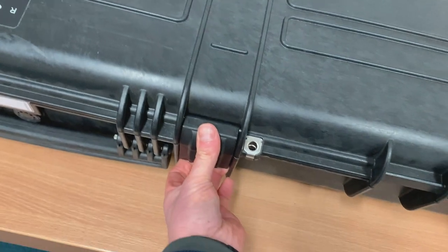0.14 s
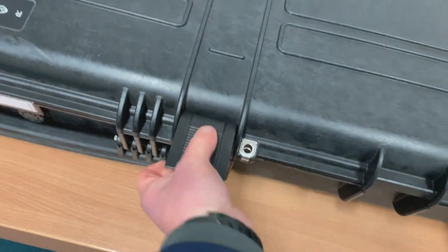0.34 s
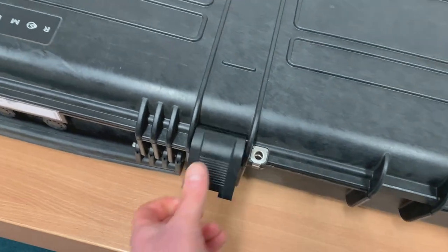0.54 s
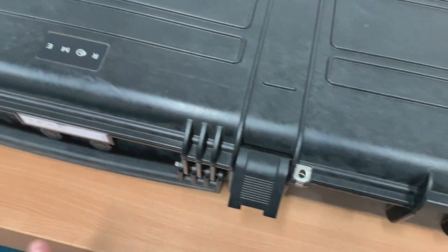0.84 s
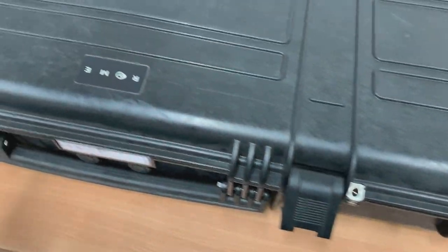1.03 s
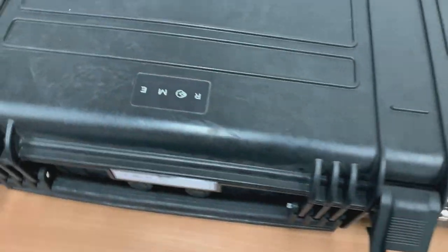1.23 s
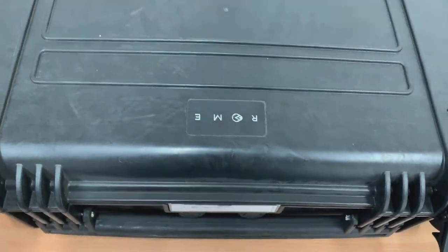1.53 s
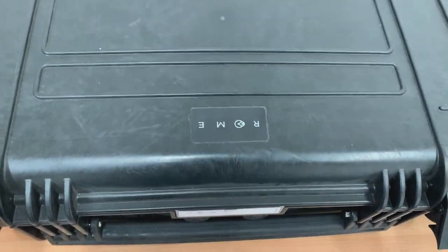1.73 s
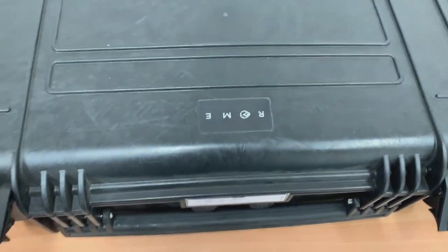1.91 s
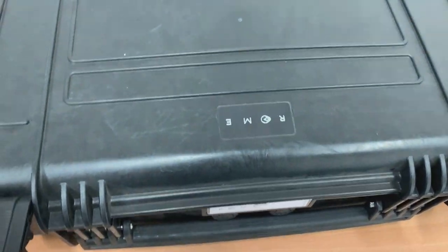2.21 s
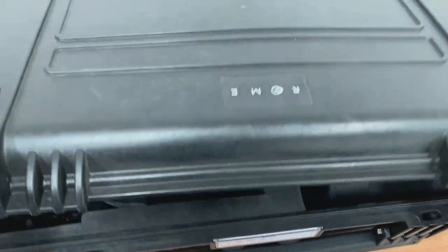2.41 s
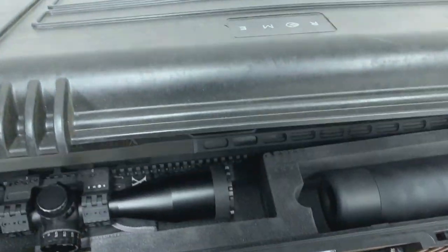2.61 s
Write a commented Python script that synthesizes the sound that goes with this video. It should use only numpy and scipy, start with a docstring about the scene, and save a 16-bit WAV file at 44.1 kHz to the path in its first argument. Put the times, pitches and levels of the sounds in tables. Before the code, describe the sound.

A plastic latch on a large hard case snaps open at 0.25 seconds, a sharp clack with a hollow thump, bouncing until 0.36. A softer knock follows at 0.57, with tiny rattles to 0.8. Near quiet until 1.4, then thin clicks at 1.46 and 1.68 amid faint hand rubbing. From 2.2 to 2.48 the lid scrapes and squeaks free with clustered low booms, fading into a lightly reverberant quiet room.

```python
"""In a quiet room, plastic latches of a big hard case snap open on a wooden table, a phone held close above.
Each snap rings the latch's short modes and thumps the hollow case; loose fittings buzz on after it.
A loose latch rattles out, a hand slides on as grainy noise, and a second latch clicks.
Then the lid squeaks off its seal and swings up, booming. The room rings after all."""
import sys
import numpy as np
from scipy import signal
from scipy.fft import rfft, irfft
from scipy.io import wavfile
from scipy.ndimage import uniform_filter1d, map_coordinates

SR = 44100
rng = np.random.default_rng(int(sys.argv[2]) if len(sys.argv) > 2 else 0)


def decibels_to_gain(level_db):
    """Convert a level in decibels to a linear amplitude gain (20 dB per decade)."""
    exponent = np.asarray(level_db, float) / 20
    return 10 ** exponent


def to_wav(sig):
    """Store sig (one row per channel, or 1-D mono) as 16-bit WAV at the path in sys.argv[1].

    Samples outside -1..1 are clipped; the rate is SR.
    """
    pcm = np.clip(np.atleast_2d(sig), -1, 1) * 32767
    pcm = np.round(pcm).astype(np.int16)
    wavfile.write(sys.argv[1], SR, pcm.T)  # frames by channels


N = 121275  # 2.75 s


def level(x, db):
    """Scale a sound to an rms level in dB."""
    return x * decibels_to_gain(db) / np.sqrt(np.mean(x ** 2))


def colour(x, points):
    """Filter a sound by (pitch_hz, gain_db) points."""
    hz, db = np.array(points).T
    f = np.arange(len(x) // 2 + 1) * SR / len(x) + 1
    gain_db = np.interp(np.log(f), np.log(hz), db)
    return irfft(rfft(x) * decibels_to_gain(gain_db), len(x))


def ring(hz, db, t60, phase, rise, size):
    """Sum of dying tones, one per mode, that swell together over the contact time."""
    t = np.arange(size) / SR
    tones = np.sin(2 * np.pi * hz[:, None] * t + phase[:, None])
    decay = 1000. ** (-t / t60[:, None])
    modes = decibels_to_gain(db)[:, None] * tones * decay
    return modes.sum(axis=0) * (1 - np.exp(-(t / rise) ** 2))


def add(out, x, s):
    """Mix x into out, starting at time s."""
    i = int(s * SR)
    out[:, i:i + x.shape[1]] += x[:, :N - i]


# tone of the quiet room's noise, only its shape counts: pitch_hz [Hz], gain_db [dB]
QUIET_TONE = [(12, -34.5), (20, -9), (74, 8.5), (104, -19), (678, -30.5), (9670, -33.5), (11800, -59),
              (14700, -28), (16000, -52)]


def quiet_room():
    """Steady filtered noise, with a part shared by both sides and a part opposite on each."""
    mid, side = (level(colour(rng.standard_normal(N), QUIET_TONE), -68) for _ in range(2))
    side = colour(side, [(60, -15.5), (1000, -1.5)])  # weaker in the bass
    return np.array([mid + side, mid - side])


# room tail by band: pitch_hz [Hz], t60_s (time to fade by 60 dB) [s],
# level_db (relative) [dB], likeness left-right [0 to 1]
ROOM = [(56.5, .7, -16.5, .97), (125, .8, -8.5, .9), (250, .7, -4, .7), (500, .65, -7, 0.82),
        (1000, 0.43, -4.5, .3), (2157, .6, -16, .3), (3704, 0.67, -13, .3), (7750, .35, -15.5, .3),
        (12800, .25, -23, .2)]
ROOM_DELAY_S = 0.0013  # how slowly the tail swells in


def room(x):
    """Walls return a diffuse tail: fading noise in overlapping bands, alike left and right in the bass."""
    size = SR  # one second
    t, tail = np.arange(size) / SR, np.zeros((2, size))
    f = np.arange(size // 2 + 1) + 1.
    for hz, t60, db, alike in ROOM:
        shape = np.clip(1 - np.abs(np.log2(f / hz)), 0, 1) ** .5  # an octave to each side
        mid, side = irfft(rfft(rng.standard_normal((2, size))) * shape, size)
        both = np.sqrt(1 + alike) * mid + np.sqrt(1 - alike) * side * np.array([[1], [-1]])
        fade = 1000. ** (-t / t60) * np.sqrt(np.log(1000) / t60 / SR)  # long tails start softer
        tail += both * decibels_to_gain(db) * fade
    tail *= 1 - np.exp(-(t / ROOM_DELAY_S) ** 2)
    return signal.fftconvolve(x[None], tail)[:, :N]


# loudness of the rubbing before its grain: time_s [s], level_db [dB]
RUB = [(0, -87), (1.0, -91.5), (1.12, -67), (1.22, -62.5), (1.33, -59.5), (1.47, -45), (1.55, -53.5),
       (1.62, -43.5), (1.75, -57), (1.9, -55.5), (2.06, -59), (2.1, -51.5), (2.17, -54), (2.2, -27),
       (2.23, -38.5), (2.26, -35.5), (2.29, -39.5), (2.335, -42), (2.36, -31.5), (2.44, -42.5), (2.55, -77),
       (2.75, -76)]
# tone of the hand on the shell, only its shape counts: pitch_hz [Hz], gain_db [dB]
HAND_TONE = [(35, -26.5), (60, -6), (130, -14.5), (579, -21.5), (715, -26.5), (1620, -29), (3040, -19.5),
             (3420, -33.5), (8320, -45.5), (16000, -66)]
# tone of the lid leaving its seal, only its shape counts: pitch_hz [Hz], gain_db [dB]
SEAL_TONE = [(530, -31.5), (900, -10.5), (2860, 5.5), (3340, -7.5), (4310, -5.5), (5410, -19.5),
             (6560, -10.5), (10200, -21), (11600, -36.5), (13700, -19), (16000, -37.5)]
SEAL_FROM_S = 2.07
GRAIN_DB, GRAIN_S = 4.5, .004  # swing per unit of grain noise; time between grains


def rubbing():
    """Friction is noise of flickering level: the hand on the shell, then the lid leaving its seal."""
    t, hold = np.arange(N) / SR, int(GRAIN_S * SR)
    steps = np.repeat(rng.standard_normal(N // hold + 1), hold)
    grain = uniform_filter1d(steps, hold)[:N]
    hand = level(colour(rng.standard_normal(N), HAND_TONE), 0)
    seal = level(colour(rng.standard_normal(N), SEAL_TONE), 0)
    loudness_db = np.interp(t, *np.array(RUB).T) + GRAIN_DB * grain
    return np.where(t < SEAL_FROM_S, hand, seal) * decibels_to_gain(loudness_db)


# tone of the buzz, only its shape counts: pitch_hz [Hz], gain_db [dB]
BUZZ_TONE = [(410, -30.5), (700, -6.5), (3030, -1.5), (3740, -10), (8760, -21.5), (10800, -25.5),
             (11700, -38), (14200, -22), (15400, -42), (16000, -89.5)]
BUZZ_DB, BUZZ_T60_S = -20, .3  # below the click's high modes; time to fade by 60 dB


def buzz():
    """Loose fittings buzz on after each click as fading noise, as strong as its high modes were struck."""
    kicks = np.zeros(N)
    s, db, _, _, high_db = np.array(CLICKS).T
    kick_power = decibels_to_gain(db + high_db + CLICK_GAIN_DB + BUZZ_DB) ** 2
    np.add.at(kicks, (s * SR).astype(int), kick_power)
    power = signal.lfilter([1], [1, -1000. ** (-2 / BUZZ_T60_S / SR)], kicks)
    loudness = np.sqrt(uniform_filter1d(power, size=129).clip(0))
    mid, side = (level(colour(rng.standard_normal(N), BUZZ_TONE), 0) for _ in range(2))
    return loudness * np.array([mid + side, mid - side])


# squeaks of the seal letting go: peak_s [s], level_db [dB], pitch_hz [Hz],
# length_s (from the peak down to about a third) [s]
SQUEAKS = [(2.2133, -29, 4400, 0.0035), (2.225, -28.5, 5370, 0.0038), (2.366, -24.5, 1620, 0.0052)]


def squeaks():
    """Sticking and slipping makes brief steady tones with a soft swell and fade."""
    t, out = np.arange(N) / SR, np.zeros(N)
    for s, db, hz, length in SQUEAKS:
        tone = np.sin(2 * np.pi * hz * (t - s))
        out += decibels_to_gain(db) * tone * np.exp(-((t - s) / length) ** 2)
    return out


# thumps into the case: start_s [s], level_db (peak) [dB], pitch_hz (favoured) [Hz], spread [octaves]
THUMPS = [(0.066, -50.5, 80, .6), (.249, -2.5, 343, 0.77), (0.2586, -7, 109, 0.64), (0.282, -23, 108, 0.42),
          (0.315, -10.5, 127, 1.1), (.337, -14, 198, 0.71), (0.358, -33.5, 149, 0.37),
          (0.572, -15.5, 354, 0.68), (0.583, -22.5, 171, .8), (0.596, -21, 110.5, 0.47),
          (0.636, -24, 121.3, 0.66), (.673, -25.5, 209.4, 0.96), (.745, -33.5, 203.6, 0.4),
          (0.796, -37, 150, 0.66), (1.19, -49.5, 250, 0.99), (1.32, -35, 119, 0.77),
          (1.398, -36.5, 115, 0.38), (1.42, -30.5, 400, 0.75), (1.466, -33.5, 200, 1),
          (1.61, -36.5, 598, 0.26), (1.679, -33.5, 133, 0.59), (1.812, -25.5, 250, 1),
          (1.822, -20.5, 115, 0.31), (2.1, -32, 270, 1.11), (2.2, -29, 500, 0.54),
          (2.207, -11.5, 389, 0.49), (2.214, -18.5, 110, 0.76), (2.234, -15.5, 93.4, 0.25),
          (2.26, -11, 350, 0.72), (2.27, -9, 110, 0.32), (2.288, -13.5, 117, 0.27), (2.302, -24.5, 875, .3),
          (2.3086, -6, 208, 0.27), (2.33, -11, 117, 0.51), (2.351, -12.5, 123, 0.52),
          (2.3709, -3.5, 159.5, 0.43), (2.374, -19.5, 646, 0.3), (2.395, -12.5, 248, .5),
          (2.412, -11, 286.5, 0.54), (2.426, -14.5, 250, 0.53), (2.441, -12.5, 307, 0.51),
          (2.452, -27, 870, 0.42), (2.455, -19, 250, .5), (2.478, -21, 216, 0.45), (2.522, -22, 250, 0.23),
          (2.58, -35, 200, 0.25), (2.698, -40.5, 206, 1)]
# modes of the case on the table: pitch_hz [Hz], level_db (relative) [dB], t60_s before any damping [s]
CASE = [(45.4, -8.5, 0.77), (65, -4.5, 0.37), (94.4, -4.5, 0.14), (117.4, -2.5, .22), (137.7, -3, .15),
        (186.5, -1, 0.093), (233.7, -3, .09), (286.1, -6.5, 0.1), (350.1, -4.5, 0.072), (389.5, -4, 0.069),
        (438, -8, .07), (571.5, -6, .06), (697.4, -7, 0.084), (899.4, -10.5, .07)]
LIFT_S, HELD_RING = 2.15, 0.69  # start of the lift; share of the ring time left under the hand
THUMP_RISE_CYCLES = 0.42  # contact time in cycles of the favoured pitch
THUMP_TURN_PER_KHZ = 3.9  # random phase between left and right, radians


def thumps():
    """Each thump sets off the case modes nearest its favoured pitch; low thumps push for longer.
    The lifting hand pulls instead of pushing and damps the lid."""
    out, (hz, mode_db, t60) = np.zeros((2, N)), np.array(CASE).T
    for s, db, centre, spread in THUMPS:
        near_db = mode_db - 3 * (np.log2(hz / centre) / spread) ** 2
        turn = THUMP_TURN_PER_KHZ * hz / 1000 * rng.standard_normal(len(hz)) / 2
        way, rings = (-1, t60 * HELD_RING) if s > LIFT_S else (1, t60)
        rise = THUMP_RISE_CYCLES / centre
        x = np.array([ring(hz, near_db, rings, k * turn, rise, size=SR // 3) for k in (1, -1)])
        add(out, way * decibels_to_gain(db) * x / np.abs(x).max(), s)
    return out


# latch clicks: start_s [s], level_db (before the shares and the common gain) [dB],
# then the shares low_db, middle_db, high_db of the three groups of modes [dB]
CLICKS = [(0.244, -11.5, -5, -14.5, -28), (0.2473, -12, -31, -39, -2.5), (0.2485, -7.5, -17, -15, -12.5),
          (0.252, 0, -6, -14.5, -23), (0.2559, -8.5, -17.5, -7, -15), (0.3102, -9, -4, -16, -3.5),
          (0.3151, -12.5, -4, -5.5, -6.5), (0.3283, -11.5, -7, -9.5, -3.5), (0.3353, -13, -3, 1.5, -5.5),
          (0.3482, -22, -24, -0.5, -15.5), (0.5684, -13, -11.5, -13, -29), (0.5739, -28, -11, -26, -9),
          (0.5839, -20, -5.5, -8.5, -12), (0.6161, -21, 0.5, -10.5, -33), (0.6298, -34, -4.5, -9, -18.5),
          (0.6678, -24.5, -10, -9.5, -24.5), (0.742, -32.5, -9, -12.5, -40), (0.7881, -37, -6.5, -13, -33),
          (0.8172, -37, -12.5, -22, -35.5), (1.2885, -66.5, -14.5, -12, -8), (1.3175, -44, -11, -12.5, -9),
          (1.3926, -48, -27.5, 11, -10.5), (1.4197, -37.5, -2.5, 2, -8), (1.4566, -8, -31, -18.5, -39),
          (1.4619, -38.5, -7, 4, -15), (1.4674, -19.5, -21, -13.5, -20), (1.4739, -42, -29, 11.5, -13),
          (1.4792, -42, -23, -8, -28), (1.497, -30, -45, -36, -20.5), (1.508, -18, -13.5, -2.5, -23.5),
          (1.6116, -37.5, -5, -20, -19), (1.6453, -37, -8, 4, -25), (1.6736, -21.5, -13, -28, -17),
          (1.6765, -9.5, -25, -7, -23), (1.728, -42, 1.5, -24, -21), (1.8195, -30, -12.5, -11, -29),
          (2.0049, -27, -10, -8.5, -50), (2.0501, -53, 1, 9.5, -28), (2.0974, -40, -5, -9, -18),
          (2.1863, -45, -15, 6, -3.5), (2.2022, -35.5, -29, -5, -0.5), (2.2099, -35.5, -24, -8, 2.5),
          (2.2217, -30.5, -29, -35, -3.5), (2.2454, -34, -38, -25, 7), (2.2829, -24, -23, -3.5, -17.5),
          (2.3012, -23, -8, -14, -8), (2.3455, -18.5, -26, -13, -10.5), (2.365, -26.5, -1.5, -20, -1.5),
          (2.6397, -47, -6.5, -5, -34.5), (2.6588, -48.5, 0, -3.5, -40.5), (2.6842, -45.5, -7, -13, -30)]
# latch modes before scatter: pitch_hz [Hz], level_db (relative) [dB], t60_s [s]
LATCH = [(912, -11, 0.015), (1358, -5, 0.015), (1620, 0, 0.012), (2090, 0, .012), (2510, -5, 0.013),
         (2861, -2, 0.015), (3424, -12, 0.0085), (4400, -3, 0.0081), (5354, -9.5, 0.0033),
         (6180, -3.5, 0.0026), (7200, -3.5, .005), (7866, -3, 0.009), (8770, -4.5, 0.0054),
         (9633, -9.5, 0.0043), (14400, -16, 0.013), (15000, -20.5, .005)]
# phase by which the right side is ahead: one value each for low, middle, high modes [radians]
GROUP_LEAD = 0.42, -0.89, 0.056
LOW_UNDER_HZ, HIGH_OVER_HZ = 2300, 3800
SWELL_S, CHATTER_S = .0016, 0.0028  # contact time of low and middle modes; time scale of the chatter
CLICK_DETUNE, CLICK_SCATTER_DB = 0.017, 1  # random spread of pitch (as a fraction) and of mode level
CLICK_TURN = .3  # random phase between left and right, radians
CLICK_GAIN_DB = 5


def clicks():
    """Low and middle modes swell over the contact, high ones are rung by its chatter."""
    out, (hz, mode_db, t60) = np.zeros((2, N)), np.array(LATCH).T
    low, high = hz < LOW_UNDER_HZ, hz >= HIGH_OVER_HZ
    groups = (low, ~low & ~high, high)
    t = np.arange(SR // 100) / SR / CHATTER_S
    for s, db, *shares in CLICKS:
        detune, scatter, start, turn = rng.standard_normal((4, len(hz)))
        click_hz = hz * (1 + CLICK_DETUNE * detune)
        click_db = mode_db + CLICK_SCATTER_DB * scatter
        chatter = rng.standard_normal(len(t)) * t * np.exp(-t ** 2)
        for g, share_db, rise, lead in zip(groups, shares, (SWELL_S, SWELL_S, 0), GROUP_LEAD):
            sides = []
            for k in (.5, -.5):  # left, right
                phase = np.pi * start + k * (CLICK_TURN * turn - lead)
                sides.append(ring(click_hz[g], click_db[g], t60[g], phase[g], rise + 1 / SR, SR // 32))
            x = np.array(sides)
            if not rise:
                x = signal.fftconvolve(x, chatter[None])
            add(out, decibels_to_gain(db + share_db + CLICK_GAIN_DB) * x / np.abs(x).max(), s)
    return out


RIGHT_LAG_S, LEFT_DB, HIGH_LEFT_DB = .0002, -3.5, 1  # left gain below 4 kHz and above 8 kHz


def scene():
    """The sound reaches the left microphone first, but weaker below the treble."""
    near = clicks() + thumps() + rubbing() + buzz() + squeaks()
    right = map_coordinates(near[1], [np.arange(N) - RIGHT_LAG_S * SR], order=3)
    left = colour(near[0], [(4000, LEFT_DB), (8000, HIGH_LEFT_DB)])
    wet = room(near.mean(axis=0)) * decibels_to_gain(np.array([[-2.5], [0]]))  # tail softer on the left
    return np.array([left, right]) + wet + quiet_room()


def low_pass(x):
    """Removes everything above the highest recorded frequency."""
    return signal.sosfilt(signal.butter(12, 16440, fs=SR, output="sos"), x)


def record(dry):
    """The phone drops the deepest bass, rounds the loudest peaks and cuts the top."""
    no_rumble = signal.sosfilt(signal.butter(2, 41, "high", fs=SR, output="sos"), dry)
    rounded = np.tanh(0.91 * no_rumble) / 0.77
    mix = signal.sosfilt(signal.ellip(8, .2, 70, 15000, fs=SR, output="sos"), rounded)
    return low_pass(mix)


dry = scene()
out = record(dry)
to_wav(out)
```